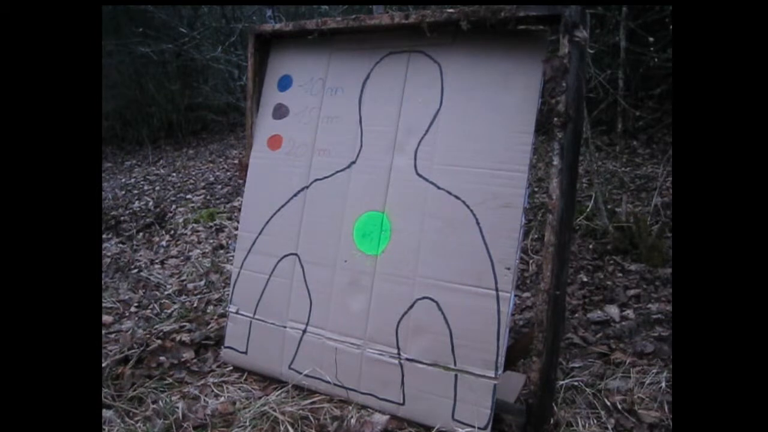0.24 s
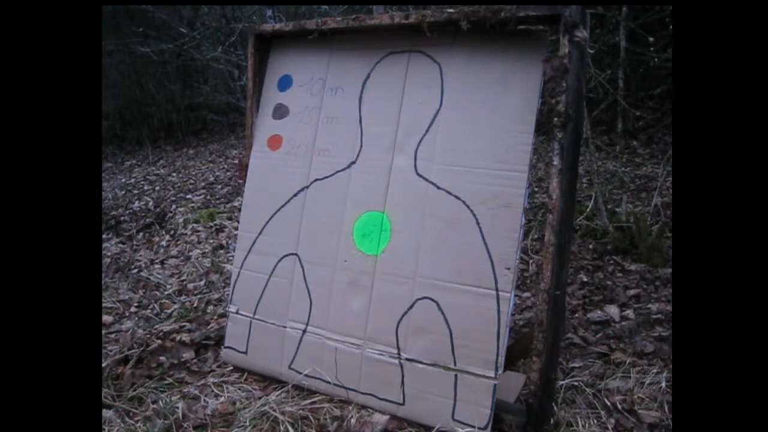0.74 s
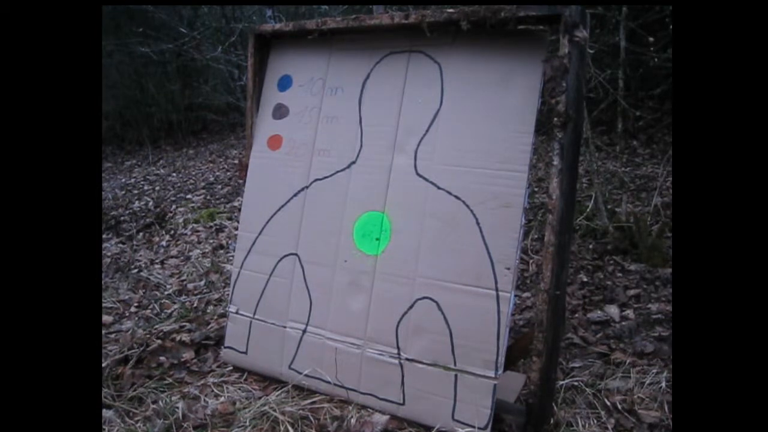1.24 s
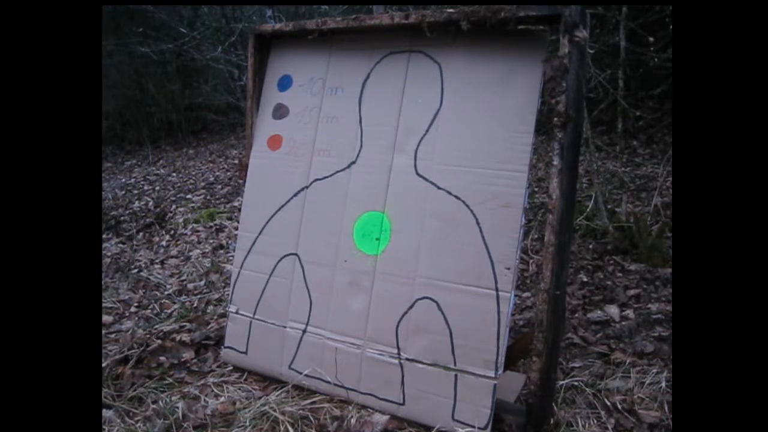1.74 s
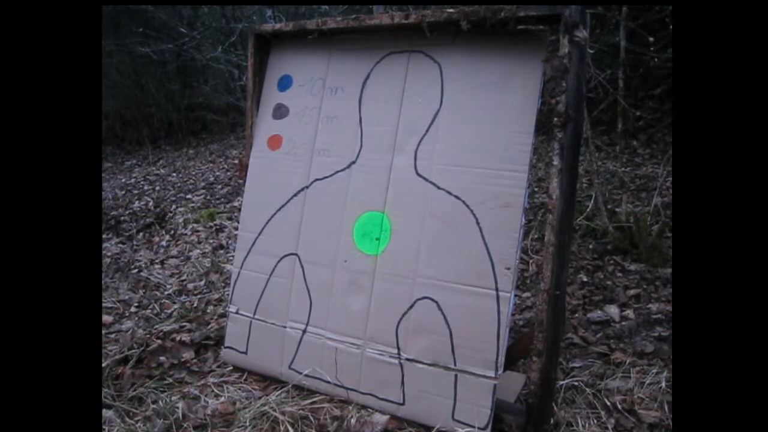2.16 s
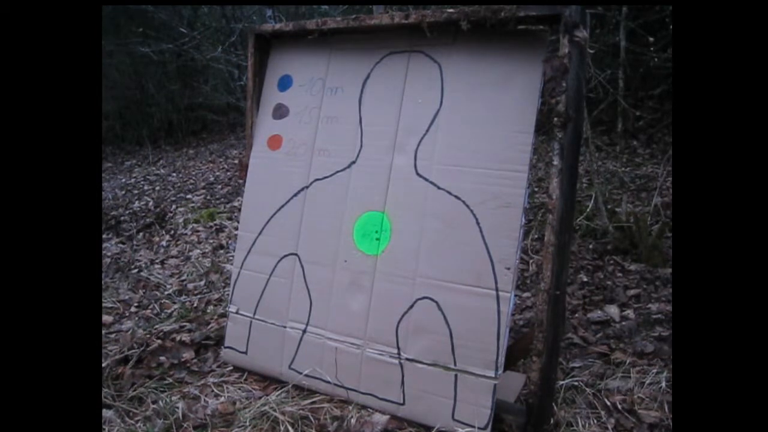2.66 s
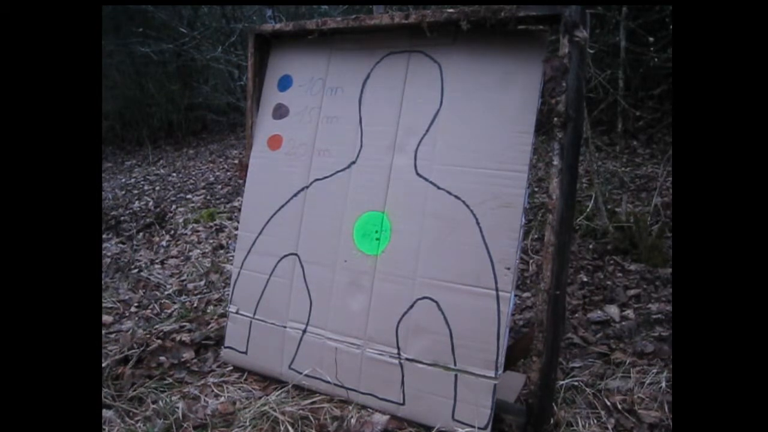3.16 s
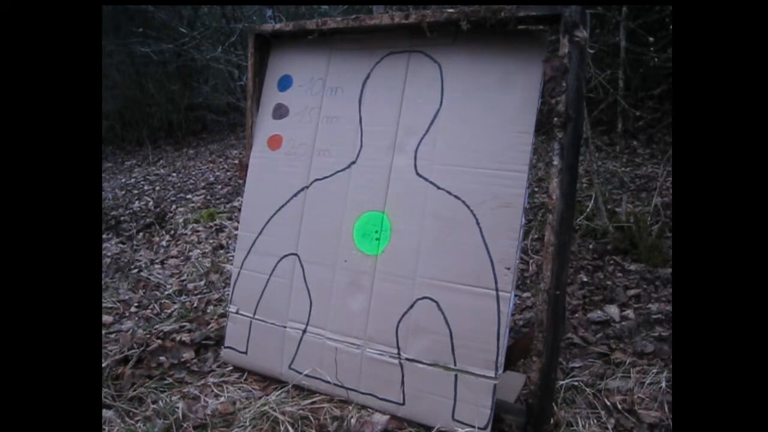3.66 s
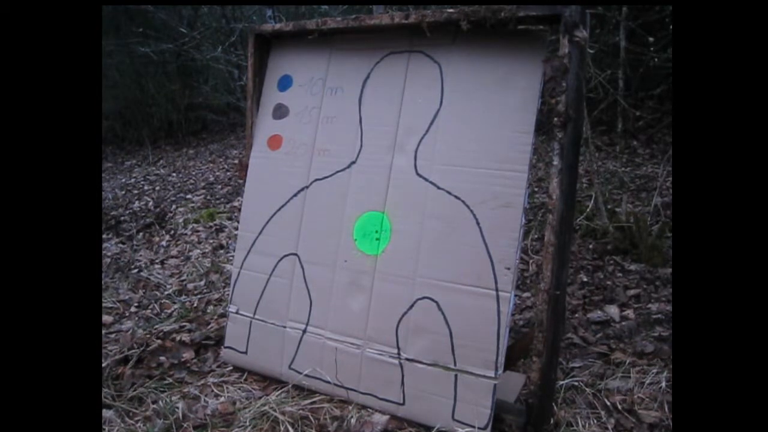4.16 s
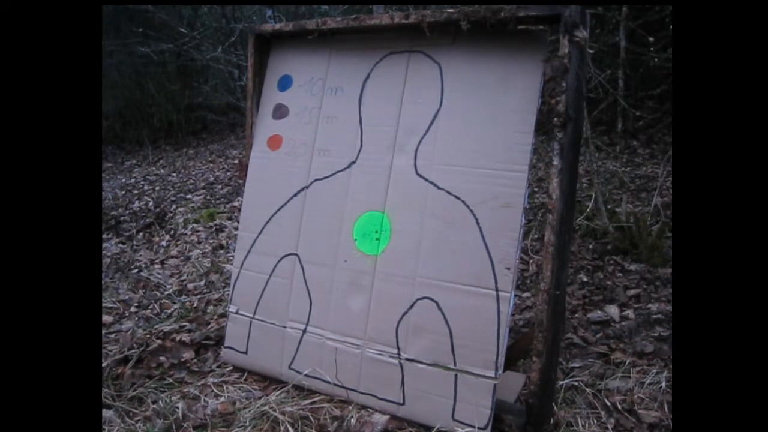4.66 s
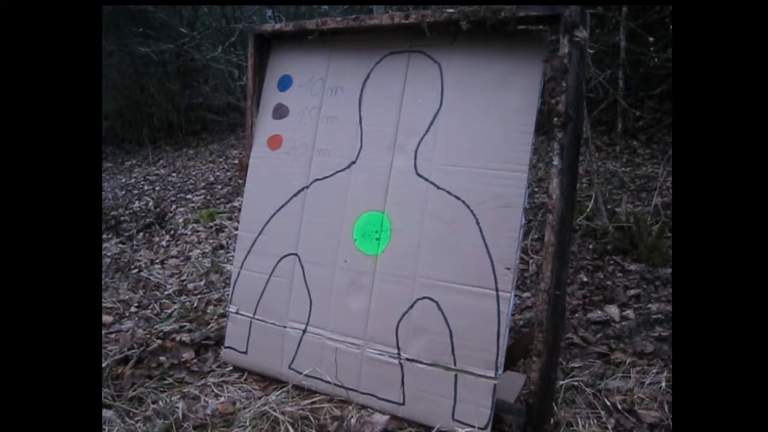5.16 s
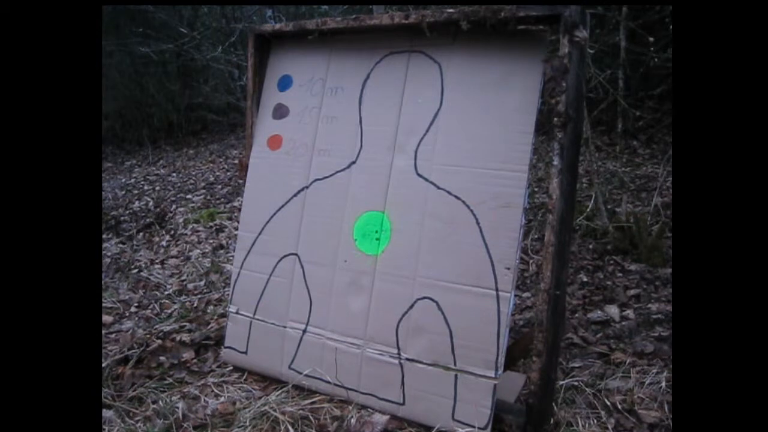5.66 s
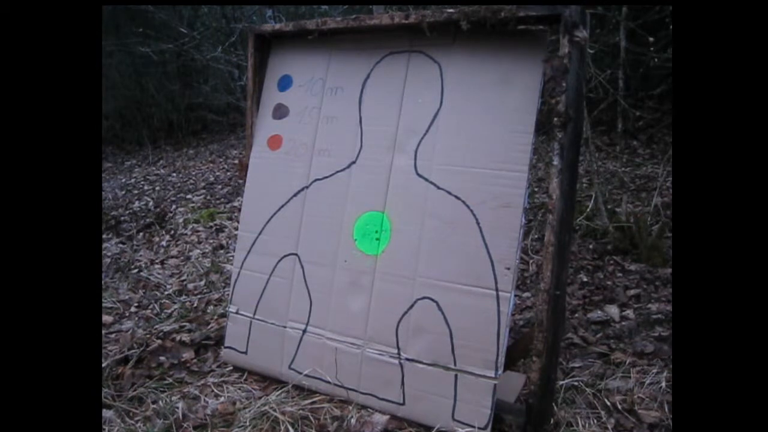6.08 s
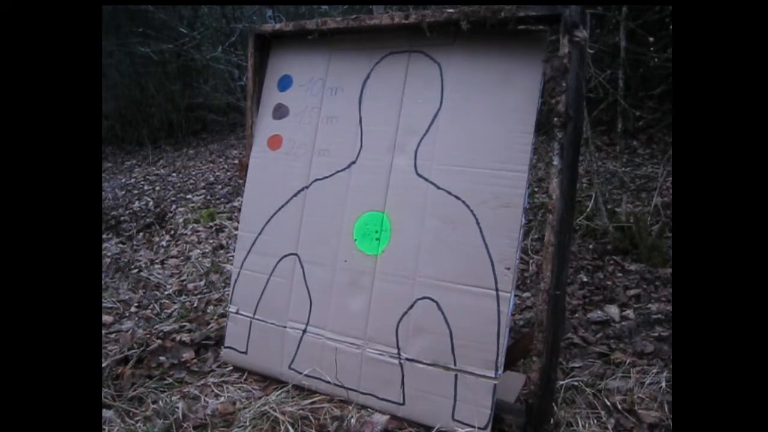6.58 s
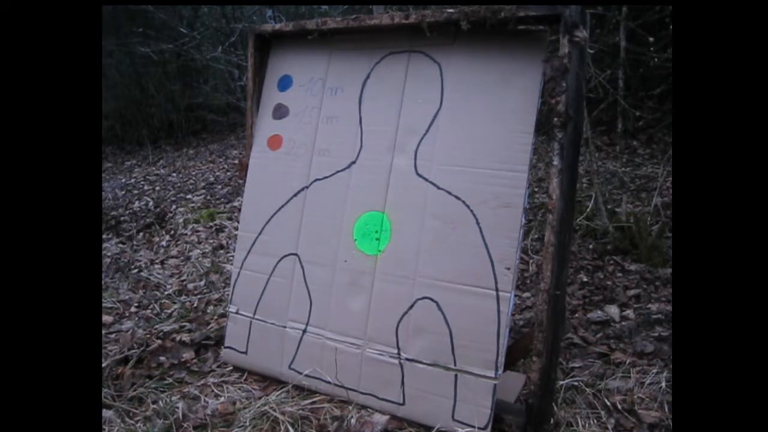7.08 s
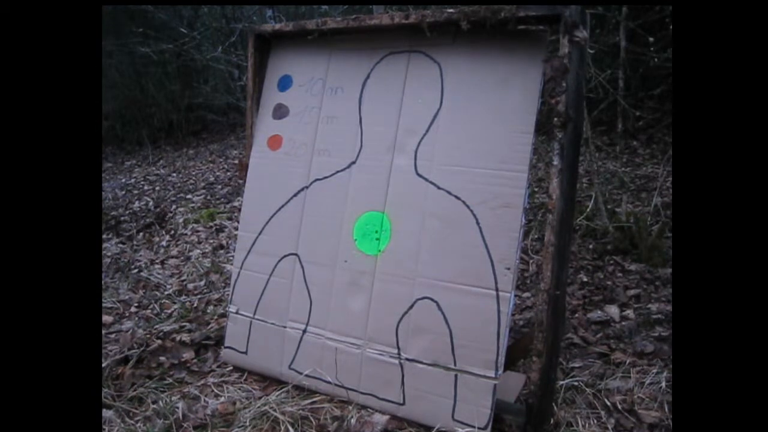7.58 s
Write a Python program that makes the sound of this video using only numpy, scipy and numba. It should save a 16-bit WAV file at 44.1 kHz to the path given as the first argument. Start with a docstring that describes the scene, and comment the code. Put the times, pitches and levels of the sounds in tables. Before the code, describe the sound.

Quiet woodland air, a soft low-weighted hush. At 0 s a faint distant horn holds for about 0.3 s, with a tiny second toot at 0.43 s, over the fading echo of an earlier shot. At 0.79 s a gas pellet pistol some metres away gives a hard bright crack with a ground slap and a short fluttering hiss; about 0.08 s later the slide clacks shut metallically, and at 0.89 s the pellet smacks through cardboard right by the microphone, papery and hollow. The trees answer with a scattered tail lasting under a second. A faint knock and leaf tick come at 1.55 s. The same pattern repeats at 2.54, 3.73, 5.53 and 6.63 s, with light ticks near 3.35 s. The hits are loud, slightly clipped and compressed. After the last smack at 6.74 s, a clearer double wooden knock comes at 6.93 s, a tiny tick at 7.09 s, then echo fades into stillness.

```python
"""Pellet pistol in a quiet wood

A gas pistol fires five plastic pellets from some metres away at a cardboard target next to the microphone.
Each shot is noise bursts through resonances: valve crack, slide stop, ground echo, then the slide slamming home.
Coloured noise vents as gas; each pellet punches paper and drums the board, and spent pellets knock on wood.
Decaying noise is the trees' answer; a far horn of wavering sines toots at the start over still air.
The recorder ducks and clips."""
import sys
import numpy as np
from scipy import signal
from scipy.fft import rfft, irfft, next_fast_len
from scipy.io import wavfile
from scipy.ndimage import uniform_filter1d, map_coordinates
from numba import njit

SR = 44100
rng = np.random.default_rng(int(sys.argv[2]) if len(sys.argv) > 2 else 0)


def gain_from_db(level_db):
    """Turn a decibel level (scalar or array-like) into a linear amplitude factor."""
    decades = np.asarray(level_db, float) / 20
    return 10 ** decades


def waveform_to_disk(signal):
    """Save audio, clipped to [-1, 1], as 16-bit WAV at the path in sys.argv[1]."""
    frames = np.transpose(np.atleast_2d(signal))
    scaled = np.clip(frames, -1, 1) * 32767
    samples = np.round(scaled).astype(np.int16)
    wavfile.write(sys.argv[1], SR, samples)


N = 345732


def unit(x):
    """Scales x to rms 1."""
    return x / np.sqrt(np.mean(x ** 2) + 1e-20)


def along(points, hz):
    """Interpolates (f/Hz, value) points on a log frequency axis."""
    f, v = np.transpose(points)
    return np.interp(np.log(hz + 1), np.log(f + 1), v)


def filtered(x, response):
    """Filters x by a complex response of frequency."""
    m = next_fast_len(len(x) + 4096)
    return irfft(rfft(x, m) * response(np.fft.rfftfreq(m, 1 / SR)), m)[:len(x)]


def resonances(peaks):
    """Causal response of (f/Hz, width/Hz, level/dB) resonances, alternating in polarity."""
    def response(f):
        total = 0
        for k, (centre, width, db) in enumerate(peaks):
            band = 1j * f * width / (centre * centre - f * f + 1j * f * width)
            total = total + (-1) ** k * gain_from_db(db) * band
        return total
    return response


def hiss(size, spectrum):
    """Noise of rms 1, coloured by (f/Hz, level/dB per Hz) points."""
    return unit(filtered(rng.standard_normal(size), lambda hz: gain_from_db(along(spectrum, hz))))


def burst(peaks, hold, t60, order=1, blow=0):
    """A first blow, then noise held and dying (seconds), through resonances order times; peak 1."""
    t = np.arange(SR // 10) / SR
    noise = rng.standard_normal(len(t)) * gain_from_db(-60 * np.maximum(t - hold, 0) / t60)
    force = noise + blow * (t == 0)
    x = filtered(force, lambda f: resonances(peaks)(f) ** order)
    return x / np.abs(x).max()


def add(track, s, x):
    """Mixes x into the track at s seconds."""
    part = track[round(s * SR):][:len(x)]
    part += x[:len(part)]


# colour of the still air: (f/Hz, level/dB per Hz, relative)
AIR_COLOUR = [(12, -34.5), (20, 0), (38, -6.5), (86, -0.5), (296, -4), (360, -3), (438, -5), (1730, -11),
              (2110, -12), (7050, -19.5), (13400, -27), (15000, -36.5), (16000, -28)]


def still_air():
    """Steady coloured noise, the quiet floor of the wood."""
    return gain_from_db(-50) * hiss(N, AIR_COLOUR)


# partials of the far horn: (f/Hz, level/dB relative)
HORN_PARTIALS = [(511, -9), (759, -17), (877.5, -2), (1012, -4), (1319, -12), (1520, -14)]
# when the horn sounds: (t/s, length/s, level/dB)
HORN_TOOTS = [(0, 0.28, -55), (.43, 0.072, -56.5)]


def far_horn():
    """Sines whose levels waver separately; each toot swells in, sags, then dies away."""
    attack_s, sag_db_per_s, release_db_per_s = 0.023, 9, 150  # the release adds to the sag
    t = np.arange(N) / SR
    horn = np.zeros(N)
    for hz, level in HORN_PARTIALS:
        waver = gain_from_db(2 * map_coordinates(rng.standard_normal(100), [t * 12]))
        horn += gain_from_db(level) * waver * np.sin(2 * np.pi * (hz * t + rng.random()))
    sounding = np.zeros(N)
    for s, length, db in HORN_TOOTS:
        attack = np.clip((t - s) / attack_s, 0, 1)
        release_db = release_db_per_s * np.maximum(t - s - length, 0)
        sounding += attack * gain_from_db(db - sag_db_per_s * (t - s) - release_db)
    return np.sqrt(2) * sounding * horn


# colour of the trees' echo: (f/Hz, level/dB per Hz, relative)
ECHO_COLOUR = [(180, -33), (300, -7.5), (405, -13), (470, -22), (603, -6.5), (787, -8), (870, -3),
               (1210, -4.5), (2700, -3), (11100, -11), (16000, -52)]


def earlier_echo():
    """The tail of a shot before the start: echo noise falling 30 dB per second."""
    t = np.arange(N) / SR
    return gain_from_db(-57 - 30 * t) * hiss(N, ECHO_COLOUR)


# decay of the echo among the trees: (f/Hz, t60/s)
TREE_DECAY = [(500, 0.97), (1500, 0.94), (2500, 0.73), (5000, 0.91), (10000, 0.49), (16000, 0.13)]


def trees(build):
    """Echoes from trunks: they thicken over build seconds, come in clumps, and the treble dies sooner."""
    hz, t, z = signal.stft(hiss(3 * SR // 2, ECHO_COLOUR), SR, nperseg=256)
    clumps = uniform_filter1d(rng.standard_normal(z.shape), size=8, axis=0)
    clumps = unit(uniform_filter1d(clumps, size=4, axis=1))
    decay_db = 60 * t / along(TREE_DECAY, hz)[:, None]
    tail = signal.istft(z * gain_from_db(1.5 * clumps - decay_db), SR, nperseg=256)[1]
    return tail * (1 - np.exp(-np.arange(len(tail)) / SR / build))


# the gas jet's bands: (multiple of jet pitch, level/dB per Hz, relative)
JET_BANDS = [(.04, -64), (.1, -31), (.2, -17.5), (.4, -4.5), (.65, -2.5), (1, 4.5), (1.3, 2.5), (1.7, -2),
             (2.3, -0.5)]
# the hiss above the jet's bands: (f/Hz, level/dB per Hz, relative)
JET_TOP = [(13000, -5.5), (14500, -13), (16500, -18)]


def jet_colour(jet_hz):
    """Spectrum of the escaping gas, most of it scaling with the jet's pitch."""
    return [(k * jet_hz, level) for k, level in JET_BANDS] + JET_TOP


def hammer_and_valve(out, s, db, jet_hz):
    """Just before the crack, gas noise swells as the valve starts to open and the hammer scrapes."""
    lead = np.arange(-SR // 100, 0) / SR
    add(out, s + lead[0], gain_from_db(db - 30.0 + 3300 * lead) * hiss(len(lead), jet_colour(jet_hz)))
    scrape = burst([(1200, 680, 0), (4500, 4800, -2)], hold=0.0037, t60=.01)
    add(out, s - 0.0063, gain_from_db(db - 25) * scrape)


# resonances of the pistol body: (f/Hz, width/Hz, level/dB relative)
PISTOL_BODY = [(3220, 1050, -4), (7000, 1500, -3), (11300, 2700, -3.5), (14600, 320, -12)]


def crack_and_stop(out, s, db, jet_hz):
    """Valve crack and slide stop ring the body; a duller copy bounces off the ground; the frame thuds."""
    stop_s, ground_s = .0011, .0065  # slide stop and ground echo after the crack
    t = np.arange(SR // 2) / SR
    body = PISTOL_BODY + [(jet_hz, 1300, 0)]
    crack = burst(body, hold=.0004, t60=.0025, blow=3)
    stop = burst(body, hold=.0012, t60=.002, blow=1)
    # the valve's first spit is bright
    crack = crack + gain_from_db(-5) * burst([(11500, 5000, 0)], hold=.0004, t60=.002, blow=3)
    direct = crack + gain_from_db(3.5) * np.roll(stop, round(stop_s * SR))
    soft = filtered(direct, resonances([(4430, 5100, 0)]))  # leaf litter dulls the reflection
    muzzle_push = (1 - t / 0.00061) * np.exp(-t / 0.0011)  # the muzzle's push of air
    add(out, s, gain_from_db(db) * direct)
    add(out, s, gain_from_db(db - 25.5) * muzzle_push)
    add(out, s + ground_s, gain_from_db(db + 1) * soft)
    frame_hz, frame_t60_s = 1002, 0.017
    add(out, s, gain_from_db(db - 10 - 60 * t / frame_t60_s) * np.sin(2 * np.pi * frame_hz * t))


# gaps in the slide that colour the escaping gas: (f/Hz, width/Hz, level/dB relative)
SLIDE_GAPS = [(2970, 450, 2), (5080, 400, -13), (6050, 700, 1)]


def venting_gas(out, s, db, jet_hz, home):
    """Fluttering jet noise, strongest at first, swelling around the slide's closing and then sealed off."""
    t = np.arange(SR // 2) / SR
    since_home = t - (home - s)
    # dwindles once the slide is home, then the valve seals
    vent = gain_from_db(-15 * t - 60 * np.maximum(since_home, 0) - 73 * np.maximum(t - .21, 0))
    pressure_db = 7.1 * np.exp(-t / 0.026)
    swell_db = 2.5 * np.exp(-np.abs(since_home) / .012)  # the returning slide squeezes out gas
    vent = vent * gain_from_db(pressure_db + swell_db)
    flutter = gain_from_db(0.62 * unit(uniform_filter1d(rng.standard_normal(len(t)), size=200)))
    gas = hiss(len(t), jet_colour(jet_hz))
    gas = unit(filtered(gas, lambda f: 1 + gain_from_db(-11) * resonances(SLIDE_GAPS)(f)))
    add(out, s + 0.001008, gain_from_db(db - 20.5) * vent * flutter * gas)


def shot_in_the_trees(out, s, db):
    """The wood answers the crack with a slowly thickening tail, and a far tree line with one soft puff."""
    trees_db = db - 20
    add(out, s, gain_from_db(trees_db) * trees(build=0.11))
    size = round(.06 * SR)
    add(out, s + .19, gain_from_db(trees_db - 11.5) * np.hanning(size) * hiss(size, ECHO_COLOUR))


# ring of the slide and spring: (f/Hz, width/Hz, level/dB relative)
SLIDE_RING = [(5600, 300, -9), (9000, 4400, -14), (12100, 1800, -11), (14300, 580, -9.5)]


def slide_home(out, home, home_db, db):
    """The slide slams shut: bright clack, dull knock, their ground echo and a longer rattle."""
    clack = gain_from_db(home_db) * burst([(9500, 5600, 0), (13200, 1600, 0.013)], hold=0.0022, t60=0.01)
    knock = burst([(2700, 2700, 0.0054), (5000, 700, 0)], hold=0.0018, t60=0.0177)
    clack = clack + gain_from_db(db - 8) * knock
    add(out, home, clack)
    add(out, home, gain_from_db(db - 10) * burst(SLIDE_RING, hold=0.023, t60=0.095))
    add(out, home + .0065, gain_from_db(2) * filtered(clack, resonances([(5000, 3800, 0.016)])))


# each shot: (t/s, crack level/dB, jet pitch f/Hz)
SHOTS = [(0.7884, -3, 3350), (2.5426, -4, 4330), (3.7258, -4.5, 4360), (5.5273, -3, 3970),
         (6.6279, -4.5, 4000)]
# the slide slams home after each shot: (t/s, bright clack level/dB)
SLIDE_CLOSINGS = [(0.869, -4), (2.6181, -7), (3.808, -5.5), (5.61, -8), (6.7119, -7.5)]


def pistol():
    """Plays each shot's mechanism in turn, most levels following its crack."""
    out = np.zeros(N)
    for (s, db, jet_hz), (home, home_db) in zip(SHOTS, SLIDE_CLOSINGS):
        hammer_and_valve(out, s, db, jet_hz)
        crack_and_stop(out, s, db, jet_hz)
        venting_gas(out, s, db, jet_hz, home)
        shot_in_the_trees(out, s, db)
        slide_home(out, home, home_db, db)
    return out


# punched paper layers: (multiple of paper pitch, width over paper pitch, level/dB relative)
PAPER_LAYERS = [(0.998, 0.27, -2), (1.25, 0.67, -2.5), (1.6, 0.55, -4.5)]


def punched_paper(paper_hz):
    """The pellet bursts through the paper layers, with the treble of the tear on top."""
    layers = [(k * paper_hz, w * paper_hz, level) for k, w, level in PAPER_LAYERS]
    punch = burst(layers, hold=0.0017, t60=0.014, blow=2.0)
    tear = burst([(6700, 2600, -11.0), (10600, 7300, -5)], hold=0.0014, t60=0.024, blow=1.1)
    return punch + gain_from_db(-14) * tear


# drum modes of the board, two low then two high: (f/Hz, width/Hz, level/dB relative)
BOARD_MODES = [(586, 100, -9.5), (865, 210, 5.5), (1270, 340, 9), (1790, 1050, -1.5)]


def drummed_board(low_db, high_db):
    """The blow drums the board's low and high modes, with a low thump and a short falling rumble."""
    t = np.arange(SR // 10) / SR
    low = burst(BOARD_MODES[:2], hold=0.00055, t60=0.011, blow=4.9)
    high = burst(BOARD_MODES[2:], hold=0.0017, t60=0.037, blow=15.4)
    drum = gain_from_db(low_db) * low + gain_from_db(high_db) * high
    thump = (1 - t / 0.00099) * np.exp(-t / 0.0015) * (1 - np.exp(-t / 0.0008))
    # low rumble under the hit
    rumble = gain_from_db(-3) * burst([(288, 630, 0)], hold=0.004, t60=0.04, order=2)
    return drum + gain_from_db(-17.5) * (thump + rumble)


# pellet through the board:
# (t/s, smack level/dB, paper f/Hz, low drum level/dB, high drum level/dB, trees' answer level/dB)
# the smack level raises paper, drum and trees alike; the last three are relative to it
PELLETS = [(0.8864, 4, 2630, -2, -2.5, -24.5), (2.6491, 6, 2850, -4, -14, -26.5),
           (3.837, 3, 2460, -3.5, -10, -24), (5.6375, 4, 2770, -2, -10.5, -26.5),
           (6.7434, 3, 2500, -5, -6.5, -24)]


def target():
    """Each pellet punches the paper, then drums the board, and the trees answer in the smack's colour."""
    out = np.zeros(N)
    for s, db, paper_hz, low_db, high_db, trees_db in PELLETS:
        add(out, s, gain_from_db(db + 3.5) * punched_paper(paper_hz))
        add(out, s + 0.000853, gain_from_db(db + 3) * drummed_board(low_db, high_db))
        answer = filtered(trees(build=0.01), resonances([(0.97 * paper_hz, 1000, 0)]))
        add(out, s, gain_from_db(db + trees_db) * answer)
    return out


# spent pellets knock on wood: (t/s, level/dB, f/Hz)
WOOD_KNOCKS = [(1.5515, -31, 1740), (6.9347, -14.5, 1360), (6.936, -19.5, 1440)]
# small ticks in the leaves: (t/s, level/dB, f/Hz, t60/s)
LEAF_TICKS = [(1.5517, -33.5, 5000, .01), (1.5615, -38, 4500, .002), (3.3294, -31, 3000, .0033),
              (3.3377, -37.5, 3000, .002), (3.352, -45, 9000, .05), (3.426, -37.5, 8600, 0.0057),
              (7.093, -37, 12100, .015)]


def knocks_and_ticks():
    """Short doubly filtered bursts at one pitch, each with a brighter rustle of leaves."""
    out = np.zeros(N)
    # (t/s, level/dB, f/Hz, width/Hz, t60/s, rustle over the knock/dB)
    drops = [(s, db, hz, 0.79 * hz, 0.016, -20.5) for s, db, hz in WOOD_KNOCKS]
    drops += [(s, db, hz, 3800, t60, -5) for s, db, hz, t60 in LEAF_TICKS]
    for s, db, hz, width_hz, t60, leaves_db in drops:
        knock = burst([(hz, width_hz, 0)], hold=0.00048, t60=t60, order=2, blow=3.0)
        rustle = burst([(5000, 3700, 1), (9300, 5400, -2)], hold=0.00043, t60=1.7 * t60, blow=2.5)
        add(out, s, gain_from_db(db) * (knock + gain_from_db(leaves_db) * rustle))
    return out


def scene():
    """Everything summed at the one microphone."""
    wood = still_air() + far_horn() + earlier_echo()
    return (wood + pistol() + target() + knocks_and_ticks())[None]


@njit
def follow(level, attack, release):
    """Peak follower: quick up, slow down."""
    out, e = np.empty_like(level), 0.0
    for i in range(len(level)):
        e += (attack if level[i] > e else release) * (level[i] - e)
        out[i] = e
    return out


def roll_off(x):
    """The treble ends steeply here."""
    return signal.sosfilt(signal.butter(12, 16500, fs=SR, output="sos"), x)


def record(dry):
    """Gain control ducks after loud hits, too late to stop the soft clipping; then the band is trimmed."""
    attack_s, release_s, top_hz, bass_hz = 0.0043, .06, 16000, 25
    loud = follow(np.abs(dry[0]), 1 / (attack_s * SR), 1 / (release_s * SR))
    ducked = dry / (1 + loud / gain_from_db(-4)) ** 1.04
    clipped = ducked / (1 + np.abs(ducked) ** 6) ** (1 / 6)

    def band(hz):
        treble = np.where(hz < top_hz, 1, gain_from_db(-30))
        return treble * 1j * hz / (bass_hz + 1j * hz)

    mix = filtered(clipped[0], band)[None]
    return roll_off(mix)


dry = scene()
out = record(dry)
waveform_to_disk(out)
```